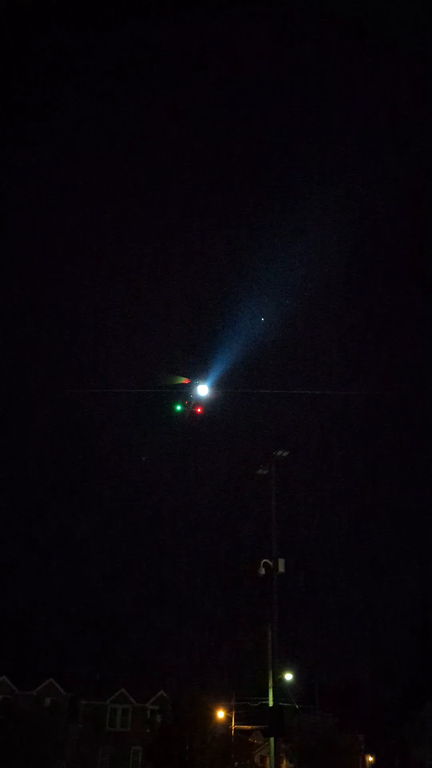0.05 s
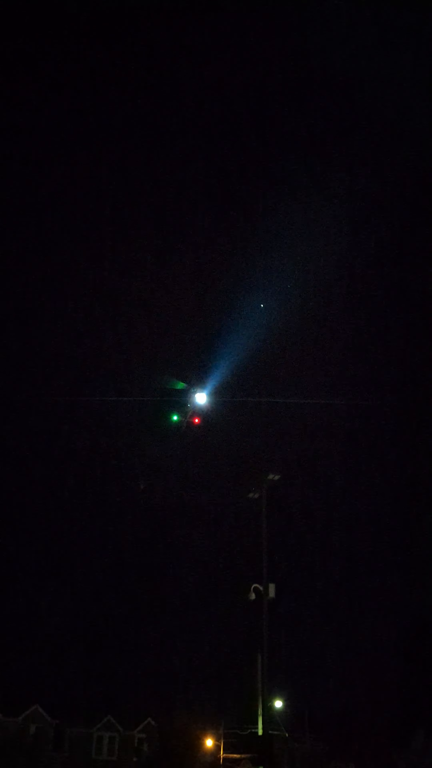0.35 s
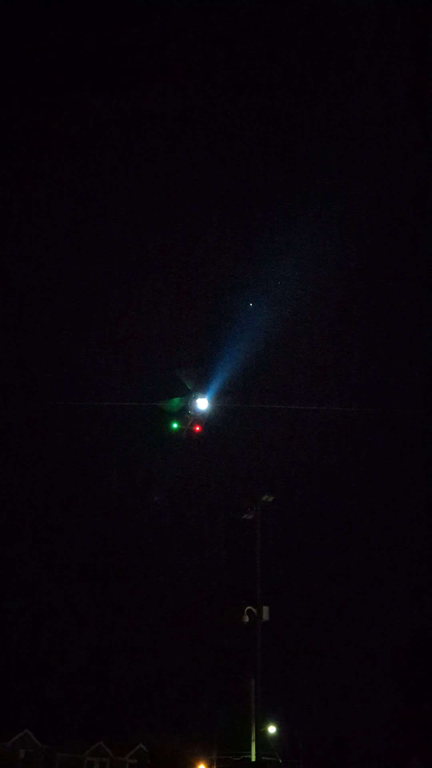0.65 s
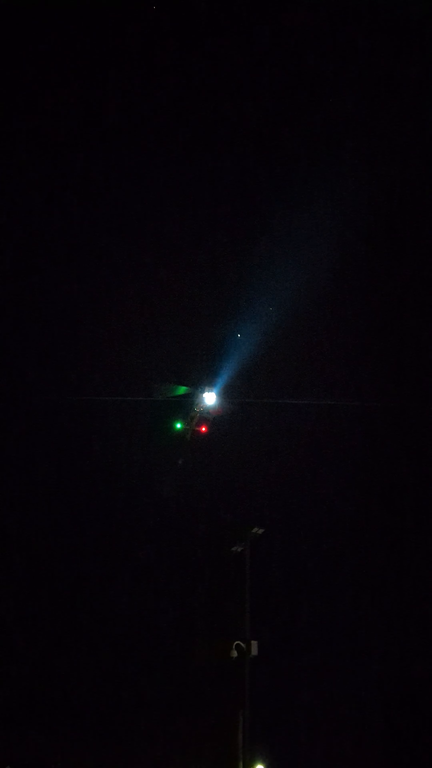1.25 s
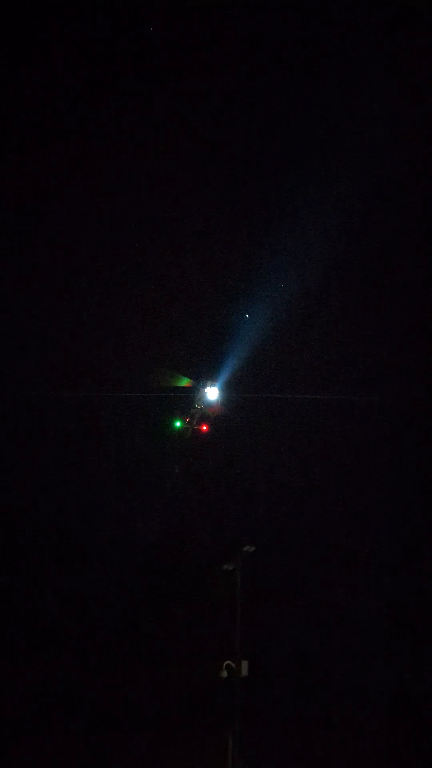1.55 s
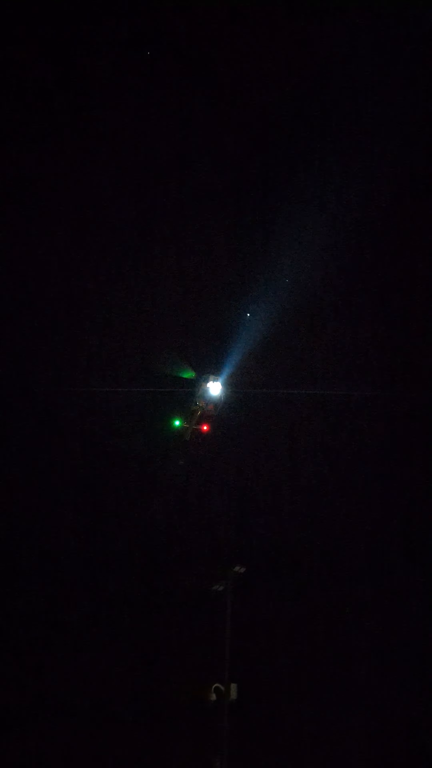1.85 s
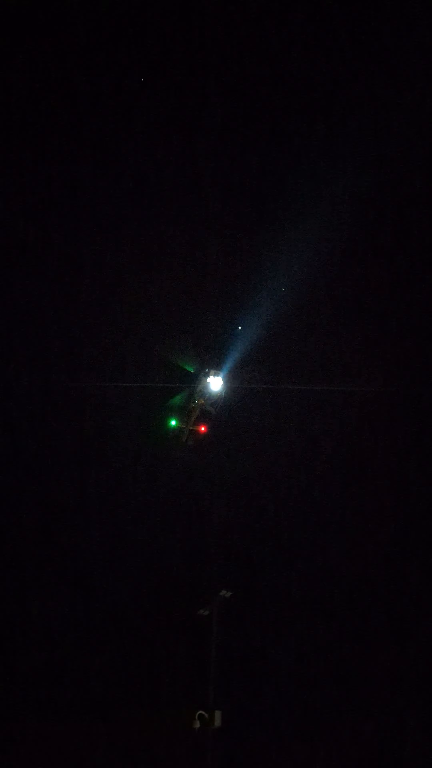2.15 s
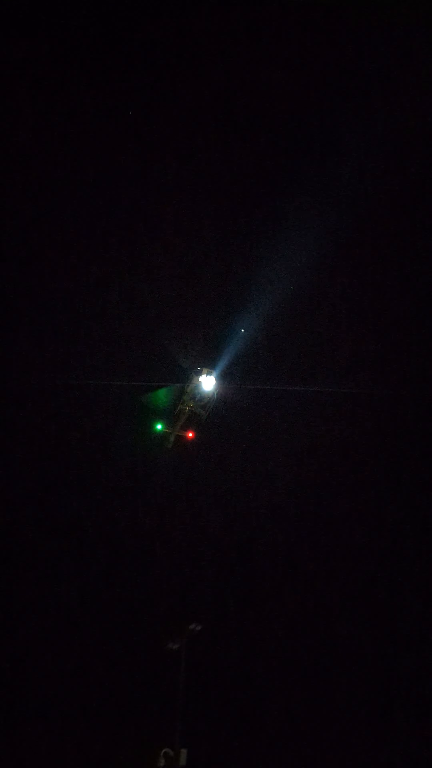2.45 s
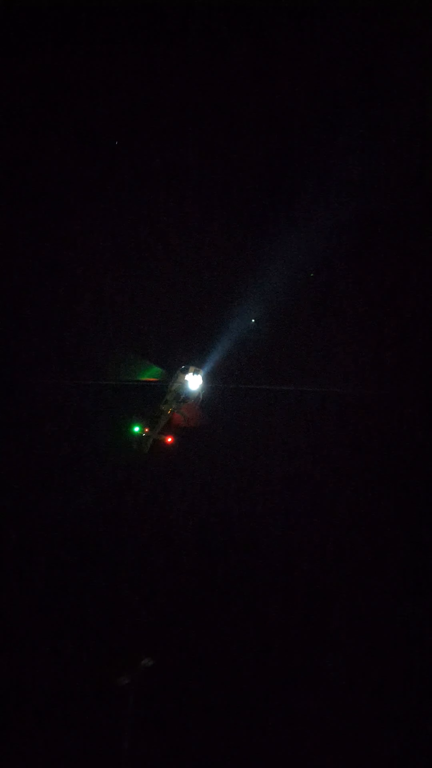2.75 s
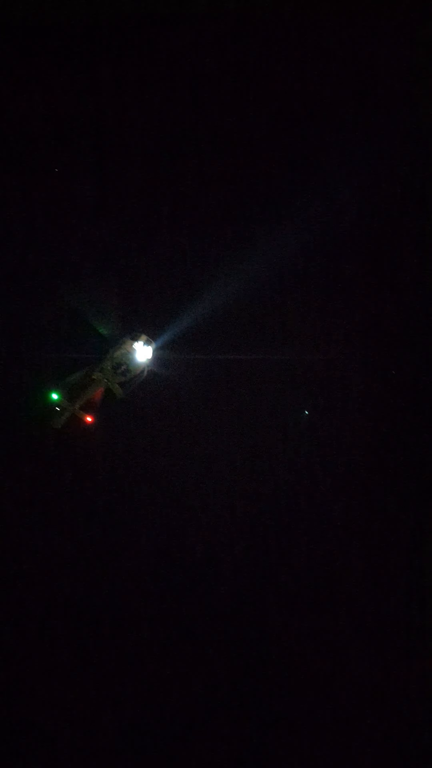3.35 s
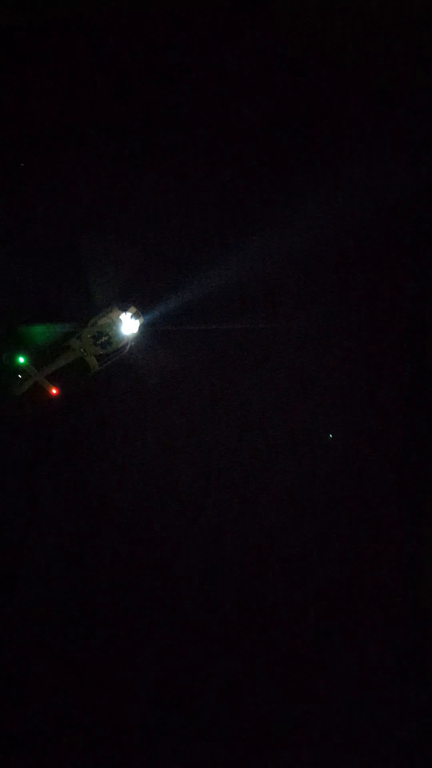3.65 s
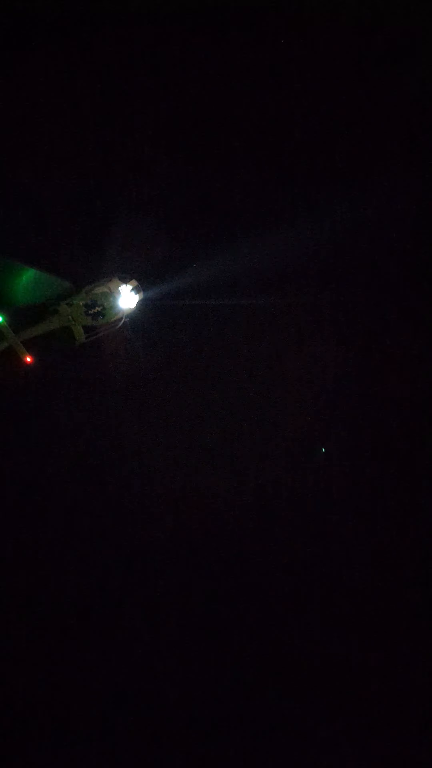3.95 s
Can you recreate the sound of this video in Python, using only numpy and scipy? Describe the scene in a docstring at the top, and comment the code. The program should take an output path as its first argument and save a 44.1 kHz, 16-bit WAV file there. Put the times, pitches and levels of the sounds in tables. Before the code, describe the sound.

Helicopter rotor chopping and slapping fast over turbine hiss, roaring more as it comes overhead.

```python
"""Helicopter approaching at night

A three-bladed helicopter flies toward a phone and climbs toward the zenith. Each blade pass gives a
low thump, a sharp slap and a swish of turbulent air, over wake roar, turbine hiss and whistle.
The ground mirrors it with a growing lag, house fronts scatter the slaps, and the phone overloads."""
import sys
import numpy as np
from scipy import signal
from scipy.fft import rfft, irfft
from scipy.io import wavfile
from scipy.ndimage import uniform_filter1d, minimum_filter1d

SR = 44100
rng = np.random.default_rng(int(sys.argv[2]) if len(sys.argv) > 2 else 0)


def generate_wav(sig):
    """Save sig (samples, or channels by samples) to the path in sys.argv[1] as 16-bit PCM at SR."""
    pcm = np.round(np.clip(np.atleast_2d(sig).T, -1, 1) * 32767).astype(np.int16)
    wavfile.write(sys.argv[1], SR, pcm)


N = 176400

# Blade rate, sinking with the Doppler shift. Each row: time in seconds, passes per second.
BLADE_RATE_HZ = [(0, 20.12), (1, 20.11), (2, 20.07), (2.6, 19.98), (3.2, 19.94), (4, 19.85)]
# Vortex cuts, one row a blade. Each row: first slap, second slap, both in relative dB.
BLADE_SLAP_DB = [(-3, -7), (-11, -11), (-9, 0)]
# Stereo width. Each row: frequency in Hz, side over mid in dB.
WIDTH_DB = [(60, -14), (110, 3.5), (200, -13.5), (380, -11), (700, -2), (1290, -3), (2380, -4.5),
            (4400, -1.5), (8120, -1), (15000, 0)]
# Stereo balance. Each row: frequency in Hz, left over right in dB.
BALANCE_DB = [(60, 4), (110, 15.5), (200, -2.5), (380, 1.5), (700, 0.5), (1290, -2.5), (2380, -5.5),
              (4400, 2.5), (8120, -6.5), (15000, 1.5)]
SWISH_LEAD_PASSES = 0.12


def slap_levels(t, passes):
    """Slap and crack dB per pass and vortex: the blades take turns, and some hit hard."""
    # Ordinary passes. Each row of both: time in seconds, relative level in dB.
    slap_trend_db = [(0, -1), (1.3, 1.5), (1.9, 1.5), (2.3, -4), (4, -3.5)]
    crack_trend_db = [(0, -9), (1.2, -3), (2, 1), (2.6, -11), (3.1, -10.5), (4, -6)]
    # Square hits on a vortex. Each row: time in seconds, slap in dB, crack in relative dB.
    hard_hits = [(.135, 1, 0), (.284, 2, 1), (.582, 0, 1), (.731, 1, 2), (.928, 2, 0), (1.178, 3, -4),
                 (1.227, 3, -4), (1.327, 3, -1), (1.428, -5, 3), (1.477, 5, 0), (1.674, 4, -2),
                 (1.926, 3, 0), (1.974, 4, 3), (2.124, -2, 5), (2.174, 4, 1), (2.275, 3, 3), (2.324, 2, 1),
                 (2.423, 2, 5), (2.572, 1, 5), (2.624, 4, 5), (3.675, -2, 2), (3.826, -1, 6)]
    scatter_db, crack_offset_db = 1, -13
    vortex_db = np.array([-5, 0])  # first, second
    shape = (int(passes[-1]) + 2, 2)
    pass_s = np.interp(np.arange(shape[0]), passes, t)
    slap_db = np.resize(np.array(BLADE_SLAP_DB), shape) + curve(slap_trend_db, pass_s)[:, None]
    crack_db = curve(crack_trend_db, pass_s)
    for hit_s, hit_db, hit_crack_db in hard_hits:
        k = np.argmin(np.abs(pass_s - hit_s))
        slap_db[k], crack_db[k] = hit_db + vortex_db, hit_crack_db
    slap_db += scatter_db * rng.standard_normal(shape)
    return slap_db, crack_offset_db + crack_db[:, None] + vortex_db


def slaps(t, passes, slap_db, crack_db):
    """Each blade cuts two tip vortices: two short pulses, each with a noisy crack."""
    # Bright snaps of the sharpest cuts. Each row: time in seconds, peak in dB.
    snap_peaks = [(2.3255, -6), (3.778, -9)]
    gap_ms, slap_width_ms, snap_width_ms = 2.88, 0.5, 0.07
    crack_lead_ms, crack_decay_ms = 0.6, 1.7
    nearest = np.round(passes).astype(int)
    jitter_ms = 0.2 * rng.standard_normal(slap_db.shape)
    since_ms = 1e3 * (passes - nearest) / curve(BLADE_RATE_HZ, t)
    direct = 0
    for k, lead_ms in enumerate((gap_ms, 0)):
        ms = since_ms + lead_ms - jitter_ms[nearest, k]
        slap = pulse(ms / slap_width_ms) * undb(slap_db[nearest, k])
        noise = unit(lowpass(noise_around(hz=1750), hz=2900, order=6))
        crack = noise * np.exp(-np.abs(ms + crack_lead_ms) / crack_decay_ms)
        direct = direct + slap + crack * undb(crack_db[nearest, k])
    near = with_reflections(direct, t)
    snaps = sum(undb(db) * pulse(1e3 * (t - at_s) / snap_width_ms) for at_s, db in snap_peaks)
    return near - snaps + street_scatter(near, t)


def thump(t, passes):
    """Blade pressure wave: harmonics wavering in the air, smeared by the microphone's bass cut."""
    # Harmonics around the boom. Each row: multiple of the blade rate, relative level in dB.
    harmonics = [(2, -10), (4, -11), (5, -10), (6, -11), (7, -17), (8, -19.5), (9, -19.5), (10, -23.5),
                 (11, -21.5)]
    # Third harmonic (the boom) and fourth. Each row of both: time in seconds, relative level in dB.
    boom_db = [(0.08, -13.5), (0.44, -11.5), (1.21, -12.5), (1.38, -21), (2.13, -11.5), (3.01, -13.5),
               (3.53, -22), (3.85, -16.5), (3.92, -30)]
    fourth_db = [(0, -8), (.8, -4), (1.7, -15), (2.2, 0.5), (4, 5.5)]
    # Trend of all but the boom. Each row: time in seconds, gain in dB, tilt in dB per octave.
    trend = [(0, -3.5, 3), (1, 0, 4.5), (1.8, -1.5, 0), (2.7, -2.5, -1.5), (3.3, -4, .5), (4, -5, 3.5)]
    # The thump falls behind the slap overhead. Each row: time in seconds, lag in blade passes.
    lag_passes = [(0, 0), (2.7, 0.0066), (3.8, 0.051)]
    wobble_db, harmonic_lag_passes = 1.35, 0.018
    boom_offset_db, boom_lead_passes = 2.5, 0.016
    passes = passes - curve(lag_passes, t)
    tilt_db = curve(trend, t, column=2)
    wave = 0
    for k, db in harmonics:
        level_db = db + curve(fourth_db, t) * (k == 4) + tilt_db * np.log2(k / 5)
        gain = undb(level_db + wobble_db * drift(t, rate_hz=5.02))
        wave = wave - gain * np.sin(2 * np.pi * k * (passes - harmonic_lag_passes))
    bass_cut = signal.butter(5, 39, "high", fs=SR, output="sos")
    wave = undb(curve(trend, t)) * with_reflections(signal.sosfilt(bass_cut, wave), t)
    boom = -np.sqrt(2) * np.sin(2 * np.pi * 3 * (passes + boom_lead_passes))
    return wave + undb(curve(boom_db, t) + boom_offset_db) * boom


def rush(t, passes, blade_db):
    """Turbulent air and turbine noise in four bands, each swelling with every blade."""
    # Each row: low edge in Hz, high edge in Hz, offset in dB, swing in dB, share of blade unevenness.
    bands = [(132, 1370, -0.5, 6, 0.058), (850, 4960, 0, 8, 0.099), (3490, 9500, -2.5, 3, 0.068),
             (10600, 20000, 3, 5.5, 0.056)]
    # Each row: time in seconds, then the roar, swish, hiss and top bands in relative dB.
    band_trend_db = [(0.1, -14, -22, -31.5, -57), (0.42, -15, -22.5, -30.5, -53.5),
                     (3.02, -14.5, -20, -29.5, -43), (3.13, -13, -19, -28.5, -40.5),
                     (3.79, -13, -19, -25, -41.5), (3.9, -15, -21, -28, -41)]
    # Spectra of the roar and the upper bands. Each row of both: frequency in Hz, density in dB.
    roar_colour = [(130, -5.5), (180, -6.5), (280, -0.5), (400, -5), (520, -7), (680, -10), (850, -24)]
    air_colour = [(470, -50), (800, 1), (883, -9), (1250, 3.5), (1430, -2), (1750, 1.5), (2100, -0.5),
                  (2600, -6), (3960, -23), (5330, -21.5), (6260, -25), (7440, -23.5), (8740, -19),
                  (11100, -24), (13200, -24), (15500, -32.5)]
    attack_passes, release_passes = 0.074, 0.42
    hold_passes = 0.096 + 0.037 * t
    gust_db, flutter_db, roar_rise_db_per_s = 0.5, 1.43, 1.1
    hz = np.arange(N // 2 + 1) * SR / N + 1
    mid, side = reflected_spectrum(t), reflected_spectrum(t) * bin_gains(WIDTH_DB)
    balance = np.sqrt(bin_gains(BALANCE_DB))
    stereo = np.array([(mid + side) * balance, (mid - side) / balance])
    swish_passes = passes + SWISH_LEAD_PASSES
    phase = swish_passes % 1
    fall = 1 - (phase - attack_passes - hold_passes) / release_passes
    swish = np.clip(np.minimum(phase / attack_passes, fall), 0, 1)
    uneven_db = (blade_db - blade_db.mean())[swish_passes.astype(int)]
    out = 0
    for k, (low_hz, high_hz, offset_db, swing_db, share) in enumerate(bands):
        rolloff = np.sqrt((1 + (low_hz / hz) ** 10) * (1 + (hz / high_hz) ** 10))
        band = irfft(stereo * bin_gains(air_colour if k else roar_colour) / rolloff, N)
        waver_db = gust_db * drift(t, rate_hz=5.3) + flutter_db * drift(t, rate_hz=150)
        swell = unit(undb((swing_db + share * uneven_db) * swish + waver_db))
        rise_db = roar_rise_db_per_s * (t - t.mean()) * (k == 0)
        level_db = curve(band_trend_db, t, column=k + 1) + offset_db + rise_db
        out = out + band / np.std(band.mean(0)) * swell * undb(level_db)
    return out


def wake(t, passes):
    """Throbbing wake noise, beamed downward, so it grows as the rotor comes overhead."""
    # Each row: time in seconds, level in dB.
    level_db = [(0, -53), (2.8, -35), (3.3, -22), (3.7, -18), (4, -16.5)]
    # Each row: frequency in Hz, density in relative dB.
    colour = [(140, -27), (205, 1.5), (310, -7), (480, -2.5), (720, -7.5), (1400, -13), (2400, -27),
              (3300, -23), (5000, -55)]
    mid, side = (reflected_spectrum(t) * bin_gains(colour) for _ in range(2))
    stereo = irfft(mid + side * bin_gains(WIDTH_DB) * np.array([[1], [-1]]), N)
    throb_db = 2.5 * np.cos(2 * np.pi * (passes - SWISH_LEAD_PASSES))
    return unit(stereo) * undb(curve(level_db, t) + throb_db)


def exhaust(t):
    """Low rumble of the turbine exhaust."""
    return undb(-20) * with_reflections(noise_around(hz=103), t)


def whistle(t):
    """Narrow band of compressor noise that emerges on the approach."""
    # Each row: time in seconds, centre in Hz, level in dB before panning.
    track = [(0, 8560, -57), (1.6, 8430, -39), (3, 8700, -38), (4, 8400, -39)]
    centre_hz = curve(track, t)
    carrier = np.exp(2j * np.pi * np.cumsum(centre_hz) / SR)
    blur = lowpass(rng.standard_normal((2, N)) + 1j * rng.standard_normal((2, N)), hz=270)
    pan = undb(curve(BALANCE_DB, centre_hz) * np.array([[0.5], [-0.5]]))
    return unit((blur * carrier).real) * pan * undb(curve(track, t, column=2))


def street_scatter(x, t):
    """Short, dull stereo tail scattered by house fronts."""
    t60_s, relative_db = 0.031, -4.5
    tail = lowpass(rng.standard_normal((2, N)), hz=790) * np.exp(-np.log(1000) * t / t60_s)
    scattered = signal.fftconvolve(x[None], tail, axes=1)[:, :N]
    return unit(scattered) * np.std(x) * undb(relative_db)


def with_reflections(x, t):
    """Direct sound plus duller echoes off the ground, a wall and a surface close to the phone."""
    # Each row of both: time in seconds, lag in ms.
    ground_lag_ms = [(0, 4.9), (1, 5.88), (2, 6.5), (2.7, 7.17), (3.3, 7.8), (4, 8.6)]
    wall_lag_ms = [(0, 9.7), (1.5, 9.25), (2.8, 8), (4, 11.4)]
    close_lag_ms = 2.97  # makes the sound hollow
    dull = lowpass(x, hz=2140, order=1)
    lags_ms = curve(ground_lag_ms, t), curve(wall_lag_ms, t), close_lag_ms
    ground, wall, close = (np.interp(t - ms * 1e-3, t, dull) for ms in lags_ms)
    return x + 0.29 * ground + 0.073 * wall + 0.07 * close


def reflected_spectrum(t):
    """Spectrum of white noise with its reflections."""
    return rfft(with_reflections(rng.standard_normal(N), t))


def noise_around(hz):
    """Noise two octaves wide, rms 1."""
    band = signal.butter(2, [hz / 2, hz * 2], "band", fs=SR, output="sos")
    return unit(signal.sosfilt(band, rng.standard_normal(N)))


def drift(t, rate_hz):
    """Smooth random motion, rms 1."""
    hold = int(SR / rate_hz)
    steps = np.repeat(rng.standard_normal(len(t) // hold + 1), hold)
    return unit(uniform_filter1d(uniform_filter1d(steps, hold), hold)[:len(t)])


def pulse(u):
    """A push between two pulls; u is time in pulse widths."""
    return (1 - u ** 2) * np.exp(-u ** 2 / 2)


def lowpass(x, hz, order=2):
    """Butterworth low-pass."""
    return signal.sosfilt(signal.butter(order, hz, fs=SR, output="sos"), x)


def curve(rows, at, column=1):
    """One table column, linearly interpolated."""
    rows = np.array(rows, float)
    return np.interp(at, rows[:, 0], rows[:, column])


def bin_gains(rows):
    """Gain per FFT bin from (Hz, dB) points."""
    hz, db = np.array(rows, float).T
    bin_hz = np.arange(N // 2 + 1) * SR / N + 1
    return undb(np.interp(np.log(bin_hz), np.log(hz), db))


def undb(db):
    """Decibels to gain."""
    return 10 ** (np.asarray(db) / 20)


def unit(x):
    """Scale to rms 1."""
    return x / np.sqrt(np.mean(x ** 2))


def scene():
    """One rotor times thump, slaps, wake and swish, over exhaust rumble and whistle."""
    first_pass_s = 0.0366
    t = np.arange(N) / SR
    passes = np.cumsum(curve(BLADE_RATE_HZ, t)) / SR
    passes = passes - np.interp(first_pass_s, t, passes) + len(BLADE_SLAP_DB)
    slap_db, crack_db = slap_levels(t, passes)
    rumble = exhaust(t)
    rotor = thump(t, passes) + slaps(t, passes, slap_db, crack_db) + wake(t, passes)
    return rotor + rush(t, passes, slap_db.max(1)) + rumble + whistle(t)


def record(dry):
    """The phone: fast peak limiter, soft clipping, steep treble cut."""
    ceiling, limiter_ms, knee, top_hz = 1.1, 4, 14, 15600
    window = int(limiter_ms * SR / 1000)
    allowed_gain = ceiling / np.maximum(np.abs(dry).max(0), ceiling)
    limited = dry * uniform_filter1d(minimum_filter1d(allowed_gain, window), window)
    clipped = limited / (1 + np.abs(limited) ** knee) ** (1 / knee)
    return signal.sosfilt(signal.ellip(10, 0.2, 80, top_hz, fs=SR, output="sos"), clipped)


dry = scene()
out = record(dry)
generate_wav(out)
```